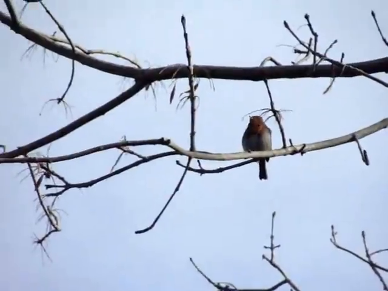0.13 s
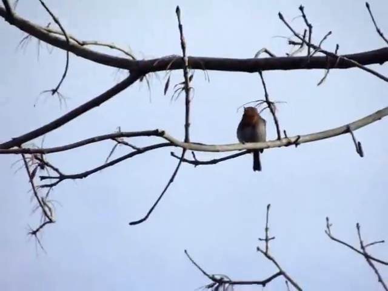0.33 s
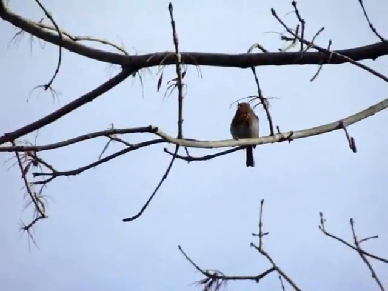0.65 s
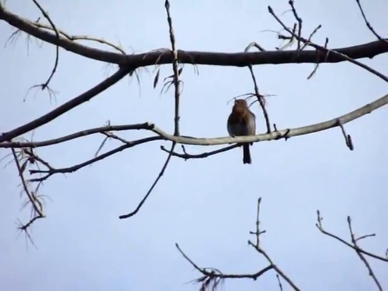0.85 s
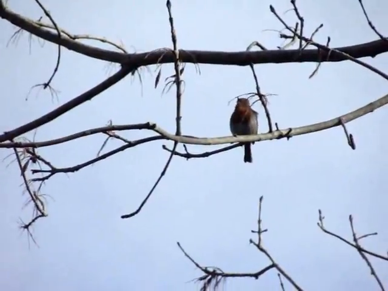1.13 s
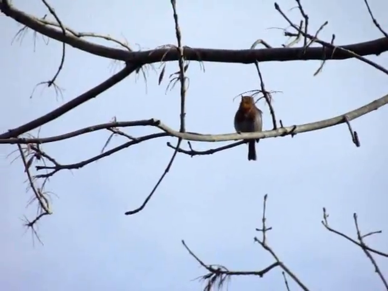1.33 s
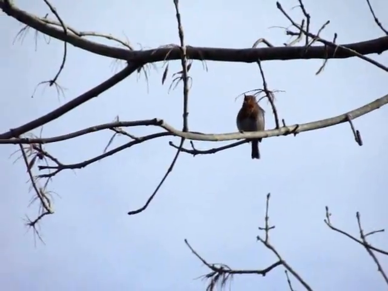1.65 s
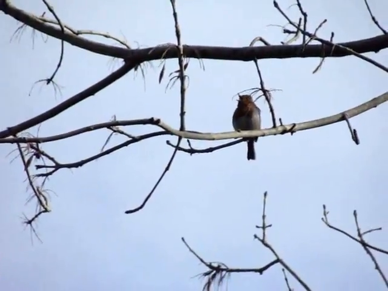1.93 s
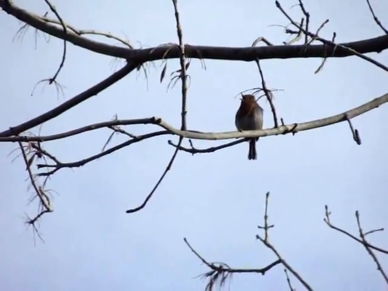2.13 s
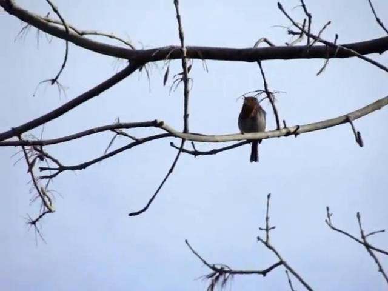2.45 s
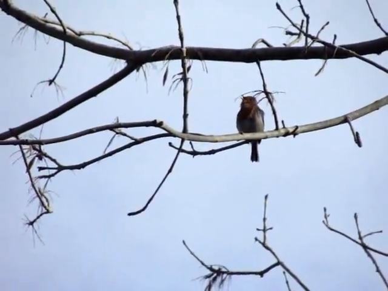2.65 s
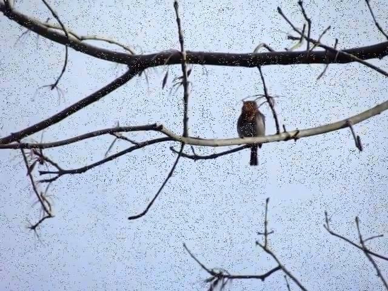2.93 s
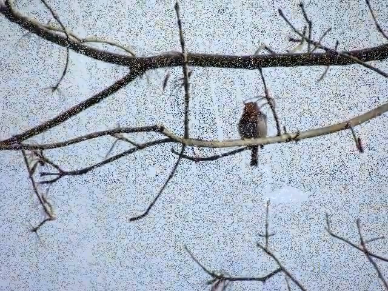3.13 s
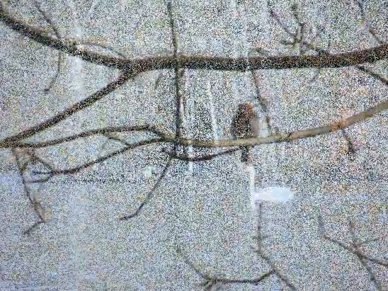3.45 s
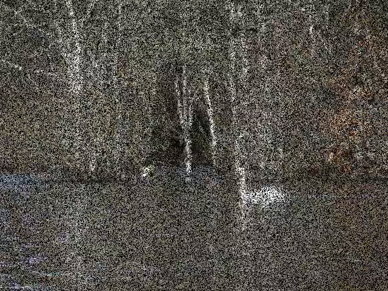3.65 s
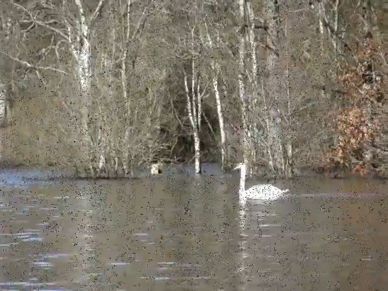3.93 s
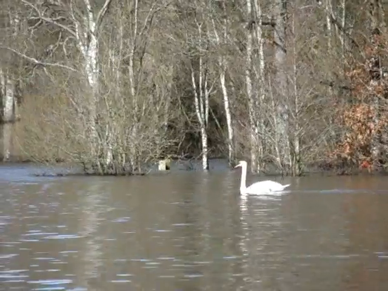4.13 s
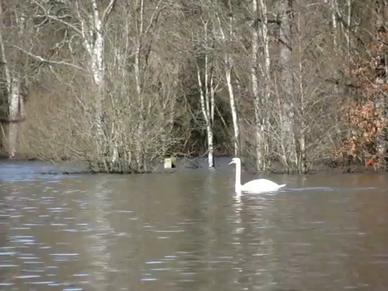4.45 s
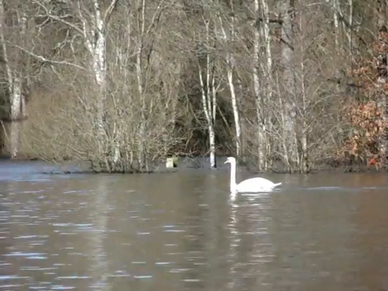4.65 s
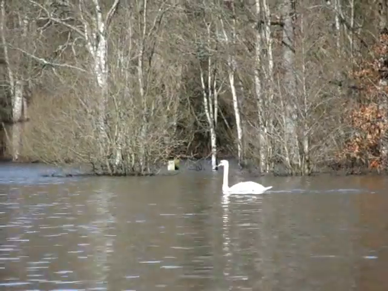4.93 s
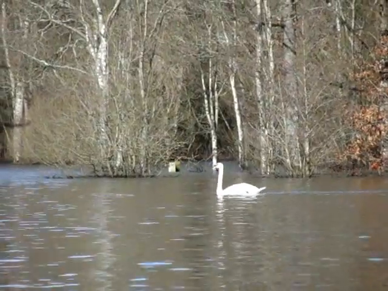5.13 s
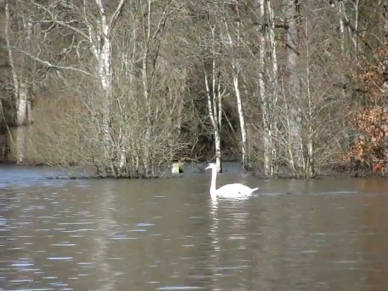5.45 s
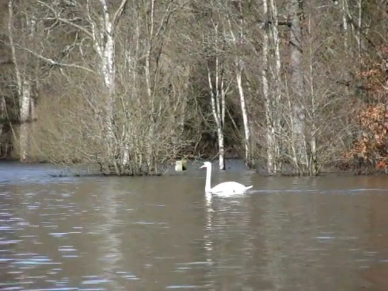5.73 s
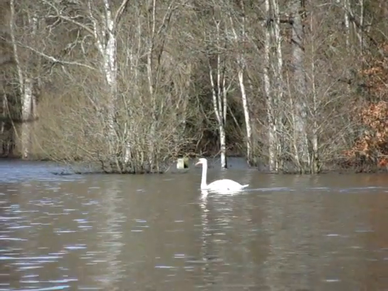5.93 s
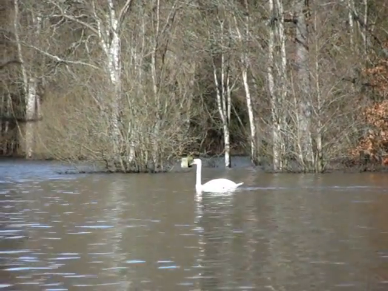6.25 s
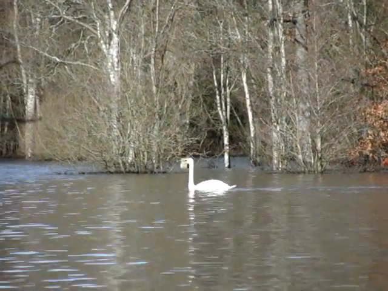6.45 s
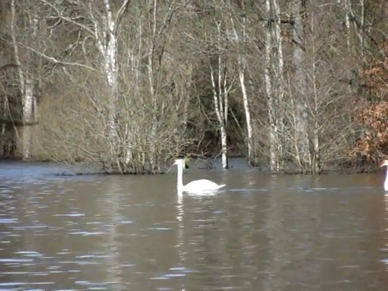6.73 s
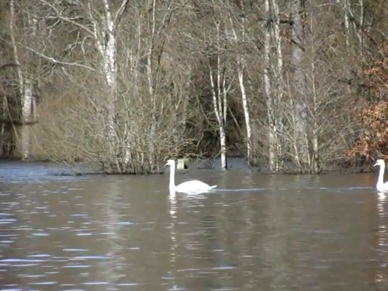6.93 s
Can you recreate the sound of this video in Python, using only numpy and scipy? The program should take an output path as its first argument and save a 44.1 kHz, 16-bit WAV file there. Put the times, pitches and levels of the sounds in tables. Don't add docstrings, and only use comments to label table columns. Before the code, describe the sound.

Outdoors, on a slightly harsh, hissy camera microphone, low wind gusts puff and thump beneath a lively robin phrase of fast chips, steep slides and thin doubled whistles, lightly echoed by trees. The song closes on softer, lower notes at about three seconds. After a short hard click, the sound settles into quiet lakeside air, with distant birds calling across the water in long woodland reverberation and no distinct splashing.

```python
import sys
import numpy as np
from scipy import signal
from scipy.fft import rfft, irfft
from scipy.io import wavfile
from scipy.ndimage import uniform_filter1d

SR = 44100
rng = np.random.default_rng(int(sys.argv[2]) if len(sys.argv) > 2 else 0)


def convert_level_to_amplitude(level_db):
    exponent = np.asarray(level_db, float) / 20
    return 10 ** exponent


def unload_audio(sound):
    columns = np.transpose(np.atleast_2d(sound))
    steps = np.round(np.clip(columns, -1, 1) * 32767)
    wavfile.write(sys.argv[1], SR, steps.astype(np.int16))


N = 313127
T = np.arange(N) / SR

# time_share, pitch_share (first to second pitch), level_db
SEEP = [
    (0, 0, -3),
    (0.201, 0.27, -1),
    (0.802, 0.72, 0.),
    (1.001, 0.011, -11.5),
]


def unit(x):
    return x / np.sqrt(np.mean(x ** 2))


def coloured(points):
    hz, db = np.transpose(points)
    bins = np.fft.rfftfreq(N, 1 / SR) + 1
    gain = convert_level_to_amplitude(np.interp(np.log(bins), np.log(hz), db))
    return unit(irfft(rfft(rng.standard_normal(N)) * gain, N))


def band(lo_hz, hi_hz, order=2):
    sos = signal.butter(order, [lo_hz, hi_hz], "bandpass", fs=SR, output="sos")
    return unit(signal.sosfilt(sos, rng.standard_normal(N)))


def walk(rate_hz):
    k = int(SR / rate_hz)
    steps = np.repeat(rng.standard_normal(N // k + 1), k)[:N]
    return unit(uniform_filter1d(uniform_filter1d(steps, k), k))


def sing(rows, shape):
    return [[(s + at * length, first + way * (second - first), db + rel) for at, way, rel in shape]
            for s, length, first, second, db in rows]


def whistle(notes, waver, flutter_db, edge_s):
    out, pitch_chance, level_chance = np.zeros(N), walk(420), walk(380)
    edge = max(int(edge_s * SR), 1)
    for note in notes:
        s, hz, db = np.transpose(note)
        span = slice(int(s[0] * SR) - edge, int(s[-1] * SR) + edge)
        t = T[span]
        glide = uniform_filter1d(np.interp(t, s, hz), edge)
        pitch = glide * (1 + waver * pitch_chance[span])
        fade = np.clip(np.minimum(t - t[0], t[-1] - t) / (2 * edge_s), 0, 1)
        level = np.interp(t, s, db) + flutter_db * level_chance[span]
        out[span] += np.sqrt(2) * convert_level_to_amplitude(level) * fade * np.sin(2 * np.pi * np.cumsum(pitch) / SR)
    return out


def trees(x, t60_s, tail_db, echo_s, echo_db, spread_s):
    t = T[:2 * SR]
    haze = unit(np.exp(-np.log(1000) * t / t60_s) * (1 - np.exp(-t / 0.048)))
    echo = unit(np.exp(-.5 * ((t - echo_s) / spread_s) ** 2))
    chance = rng.standard_normal((2, len(t))) / np.sqrt(len(t))
    response = convert_level_to_amplitude(tail_db) * haze * chance[0] + convert_level_to_amplitude(echo_db) * echo * chance[1]
    return signal.fftconvolve(x, response)[:N]


def air():
    # freq_hz, density_db (per Hz)
    tree_air = [(240, -33), (400, -14), (730, -14.5), (917, -11), (1180, -15.5), (2100, -13.5), (3140, -21),
                (9800, -25.5), (12700, -91), (21600, -120)]
    lake_air = [(15, -46), (25, -16), (70, -10), (155, -8), (304, -6), (345, -8), (936, -4), (1300, -10),
                (1980, -3), (2610, -13), (4410, -13), (5520, -16.5), (9800, -19.5), (12700, -50),
                (21600, -120)]
    # time_s, lake_share (0-1)
    dissolve = [
        (2.95, 0.),
        (3.62, .7),
        (3.72, 1.),
    ]
    tree_db, lake_db, circuit_db = -52, -51.8, -74.0
    chatter = convert_level_to_amplitude(-14 + 3 * walk(40)) * band(1850, 2100)
    chatter += convert_level_to_amplitude(-19 + 3 * walk(25)) * band(1330, 1460)
    tree = convert_level_to_amplitude(tree_db + 0.78 * walk(3.22)) * coloured(tree_air)
    lake = convert_level_to_amplitude(lake_db + 0.11 * walk(3.29)) * (coloured(lake_air) + chatter)
    share = np.interp(T, *np.transpose(dissolve))
    return (1 - share) * tree + share * lake + convert_level_to_amplitude(circuit_db) * rng.standard_normal(N)


def wind():
    # time_s, rumble_db
    gusts = [(0.0, -45), (0.18, -34), (0.24, -43.5), (0.44, -29), (0.47, -19.5), (0.7, -26), (0.87, -43.5),
             (0.9, -35), (1.12, -49), (1.82, -36), (2.19, -37), (2.46, -52.5), (2.67, -36), (2.86, -47),
             (3.39, -41.5), (3.62, -48)]
    flap_full_db, flap_slope, flap_least_db = -24.5, 1.2, -17.5
    puffs_db = 2.0 * walk(29.73)
    rumble = unit(convert_level_to_amplitude(puffs_db) * (band(70, 193) + convert_level_to_amplitude(-4) * band(36.6, 83)))
    flap = unit(convert_level_to_amplitude(0.4 * puffs_db + 4.3 * walk(90)) * band(224, 620, order=3))
    rumble_db = np.interp(T, *np.transpose(gusts), right=-120)
    flap_db = np.clip(flap_slope * (rumble_db - flap_full_db), flap_least_db, 0)
    return convert_level_to_amplitude(rumble_db) * (rumble + convert_level_to_amplitude(flap_db - 3.0) * flap)


def quick_syllables():
    # time_share, pitch_share (first to second pitch), level_db
    flick = [
        (0, .1, -1.5),
        (.48, 0.014, -1.5),
        (0.658, 0.17, -0.5),
        (0.822, .6, 2),
        (1, 1, -14.5),
    ]
    stroke = [
        (0, 0, -7),
        (.22, .28, -1.5),
        (.5, .68, 0.),
        (0.742, .76, -2),
        (1.001, 1, -17),
    ]
    scoop = [
        (0, 0, -24),
        (.3, .66, -9),
        (.42, .87, 0.),
        (.58, 1, -3),
        (1, 1, -7),
    ]
    chip = [
        (0, 0, -25.5),
        (.25, 0.26, -4.5),
        (0.381, 0.86, -2.5),
        (0.561, 0.62, -5),
        (1, .1, -39),
    ]
    # start_s, length_s, first_hz, second_hz, level_db
    seeps = [(.27, 0.096, 8210, 8320, -46.5), (.465, 0.066, 9300, 9740, -49.5),
             (.668, 0.032, 8140, 8140, -21.5), (.7, .028, 8930, 8460, -37.5),
             (.728, 0.039, 8190, 8080, -27), (.804, 0.0129, 8000, 8400, -37.5),
             (.825, 0.019, 8250, 8300, -48), (.828, 0.015, 7430, 7000, -36.5),
             (1.016, 0.016, 5340, 5130, -18), (1.542, .033, 7900, 7100, -52),
             (1.665, .022, 8930, 9240, -28), (2.229, 0.037, 7920, 8070, -23.5),
             (2.243, 0.03, 9020, 9200, -32)]
    flicks = [
        (.826, .021, 3530, 4550, -19.5),
        (.959, .023, 3280, 5003, -17.5),
        (1.099, .026, 3494, 4990, -13.5),
        (1.258, 0.021, 3424, 5400, -15.5),
    ]
    strokes = [
        (.871, 0.011, 3500, 2870, -20.5),
        (1.026, .039, 5206, 3040, -14),
        (1.178, .044, 5800, 2904, -12),
        (1.95, 0.037, 8920, 7010, -19),
    ]
    scoops = [
        (.851, .022, 3250, 4180, -15),
        (1.627, .026, 2700, 8370, -19),
        (1.915, .017, 3990, 8400, -19),
        (2.201, .028, 3500, 8900, -21),
        (2.342, .014, 3510, 8800, -23),
    ]
    chips = [
        (.899, .021, 3150, 4050, -5),
        (2.128, .02, 8100, 8580, -20),
    ]
    short = sing(seeps, SEEP) + sing(flicks, flick) + sing(strokes, stroke)
    return short + sing(scoops, scoop) + sing(chips, chip)


def peaked():
    # start_s, length_s, shoulder_hz, peak_hz, level_db
    rows = [
        (1.92, .047, 7000, 7710, -20),
        (2.005, .071, 7620, 8150, -17),
        (2.101, .064, 7550, 8850, -15),
    ]
    leap_s, shoulder_s, peak_s = 0.0076, 0.014, .039
    leap_from, drop_to_hz, climb_db_per_khz = .62, 6740, -6.5
    return [[(s, leap_from * hz, db - 25.5),
             (s + leap_s, hz, db),
             (s + shoulder_s, hz * 1.01, db - 4),
             (s + peak_s, peak, db + climb_db_per_khz * (peak - hz) / 1000 + 1.0),
             (s + max(length, peak_s + 0.014), drop_to_hz, db - 9)]
            for s, length, hz, peak, db in rows]


def duet():
    # time_s, pitch_hz, level_db
    high_voice = [(2.348, 6177, -26), (2.355, 6696, -21), (2.378, 6103, -28), (2.411, 6710, -20.5),
                  (2.468, 6936, -18.5), (2.512, 6707, -17.5), (2.534, 5700, -23.5)]
    low_voice = [(2.357, 8680, -37), (2.361, 6935, -18.5), (2.366, 5900, -32), (2.386, 5080, -29),
                 (2.425, 5830, -28), (2.506, 5650, -25.5), (2.525, 5350, -37)]
    high, low = np.transpose(high_voice[2:]), np.transpose(low_voice)
    low_hz = np.interp(high[0], low[0], low[1])
    low_db = np.interp(high[0], low[0], low[2])
    side_tone = np.transpose([high[0], 2 * high[1] - low_hz, low_db - 9])
    return [high_voice, low_voice, side_tone]


def song():
    # time_s, pitch_hz, level_db
    open_high = [(.525, 9510, -30), (.54, 9250, -37.5), (.582, 8790, -28), (.645, 8510, -25.5),
                 (.657, 8500, -49)]
    open_low = [(.476, 8420, -46), (0.5, 8040, -35.5), (.515, 8450, -37.5), (0.547, 8130, -38),
                (.57, 8200, -30)]
    fade_high = [(1.316, 3700, -24.5), (1.342, 3650, -20), (1.355, 3955, -25.5), (1.385, 3540, -24),
                 (1.411, 3690, -24.5), (1.53, 3617, -40)]
    fade_low = [(1.318, 3400, -38), (1.35, 3230, -33), (1.4, 3220, -35), (1.456, 3300, -39),
                (1.525, 3420, -46)]
    swoop_high = [(1.692, 8960, -39), (1.705, 9010, -24), (1.73, 8730, -22), (1.787, 7244, -17.5),
                  (1.799, 6530, -21.5), (1.818, 4580, -33)]
    swoop_low = [(1.635, 4987, -35), (1.642, 6662, -26), (1.66, 7373, -22.5), (1.68, 7800, -19),
                 (1.703, 7880, -18), (1.741, 7475, -22), (1.784, 6890, -27.5)]
    long = [open_high, open_low, fade_high, fade_low, swoop_high, swoop_low]
    return quick_syllables() + peaked() + long + duet()


def robin():
    # time_s, pitch_hz, level_db
    closing = [
        [(2.605, 3420, -21), (2.617, 3600, -14), (2.63, 3662, -14), (2.67, 3590, -15), (2.74, 3536, -16),
         (2.76, 3467, -15.5), (2.775, 3310, -17.5), (2.787, 2400, -46)],
        [(2.836, 2767, -26), (2.86, 3074, -18.5), (2.9, 3118, -19.5), (2.922, 3060, -25), (3.015, 2978, -29),
         (3.035, 2990, -35), (3.06, 3190, -42), (3.088, 2970, -44), (3.1, 2750, -56)],
    ]
    voices = whistle(song(), waver=.0075, flutter_db=2.2, edge_s=.0015)
    voices += whistle(closing, waver=.002, flutter_db=1.1, edge_s=.002)
    voices = voices * (1 + convert_level_to_amplitude(-19) * band(50, 600))
    throat = voices + 0.15 * voices ** 2 - 0.6 * voices ** 3
    twigs = trees(voices, t60_s=0.32, tail_db=-17.5, echo_s=0.013, echo_db=-20.5, spread_s=0.0037)
    wood = trees(voices, t60_s=1.0, tail_db=-24, echo_s=0.066, echo_db=-19.5, spread_s=0.028)
    return throat + twigs + wood


def thumps():
    # start_s, level_db (peak), pitch_hz
    eddies = [
        (0.414, -19, 262),
        (0.454, -12, 368),
        (0.494, -9.5, 310),
        (0.543, -21, 183),
        (0.585, -15, 191),
        (0.608, -10, 167),
        (0.683, -9.5, 252),
    ]
    out = np.zeros(N)
    for s, db, hz in eddies:
        cycles = (T - s) * hz
        out += convert_level_to_amplitude(db - 1.5) * np.sin(2 * np.pi * cycles) * np.exp(-((cycles - .6) / 0.85) ** 2)
    return out


def far_birds():
    # time_share, pitch_share (first to second pitch), level_db
    whit = [
        (0, 0, -24),
        (.12, .45, -17),
        (.19, 1.03, -2.),
        (.3, 1, -3),
        (.65, 1, -1.),
        (1, .99, -10),
    ]
    # start_s, length_s, first_hz,
    # second_hz, level_db
    held = [
        (3.85, .035, 4750, 4800, -60),
        (3.93, .06, 3050, 2590, -65),
        (3.96, .085, 4460, 4450, -58),
        (4.06, .06, 2660, 2480, -63),
        (4.095, .09, 4290, 4240, -57),
        (5.056, .02, 5100, 6300, -51),
        (5.256, .02, 4800, 6000, -53),
        (3.32, .09, 2960, 2930, -58),
        (3.18, .04, 3800, 3100, -59),
    ]
    smeared = [
        (3.53, .13, 5150, 5300, -69),
        (3.71, .07, 5300, 5200, -64),
        (3.8, .2, 5450, 5200, -66),
        (4.07, .1, 5150, 5200, -66),
    ]
    whits = [
        (5.06, .13, 2800, 4275, -41.5),
        (5.26, 0.12, 2800, 4290, -43.5),
    ]
    # start_s, level_db, pitch_hz
    slurs = [
        (4.196, -59, 3550),
        (4.261, -52.5, 3420),
        (4.329, -50, 3530),
        (4.402, -49, 3440),
        (4.478, -50, 3364),
        (4.558, -51, 3325),
        (4.63, -51, 3310),
    ]
    tick_rows = [
        (5.974, -44, 7240),
        (6.215, -46, 6920),
    ]
    twitter_rows = [
        (6.5468, -59, 7700),
        (6.5877, -54, 7960),
        (6.6531, -57, 7740),
        (6.7299, -53, 8030),
        (6.7618, -49.5, 7760),
        (6.8766, -57, 7380),
        (6.912, -56, 7630),
        (6.9739, -54, 7570),
        (7.0367, -60, 7370),
    ]
    trill = [[(s, hz, db - 3), (s + .02, hz * .96, db), (s + .035, hz * .89, db + 1), (s + .046, hz * .82, db - 6)]
             for s, db, hz in slurs]
    ticks = [[(s, hz * .7, db - 8), (s + .003, hz * 1.06, db - 4), (s + .016, hz * .94, db - 10)]
             for s, db, hz in tick_rows]
    twitter = [[(s, hz * 1.05, db - 8), (s + .015, hz, db - 5), (s + .05, hz * .96, db - 9)]
               for s, db, hz in twitter_rows]
    clear = sing(held, SEEP) + sing(whits, whit) + trill
    calls = whistle(clear, waver=0.0054, flutter_db=3.5, edge_s=0.0022)
    calls += convert_level_to_amplitude(3) * whistle(sing(smeared, SEEP), waver=.04, flutter_db=3, edge_s=.004)
    calls += whistle(twitter + ticks, waver=.035, flutter_db=3, edge_s=.002)
    calls = calls + trees(calls, t60_s=.15, tail_db=-8, echo_s=.012, echo_db=-10, spread_s=.006)
    return calls + trees(calls, t60_s=2.2, tail_db=-10.5, echo_s=.47, echo_db=-18, spread_s=.01)


def knock():
    # start_s, level_db (peak)
    start_s, peak_db = (3.4333, -22.5)
    # freq_hz, level_db, t60_s
    modes = [
        (2250, -7, 0.028),
        (3120, -4.5, 0.011),
        (4500, -8, 0.0062),
        (6480, -1.5, 0.014),
        (14200, -35, 0.0073),
    ]
    t = np.clip(T - start_s, 0, None)
    ring = sum(convert_level_to_amplitude(db) * np.sin(2 * np.pi * hz * t) * np.exp(-np.log(1000) * t / t60) for hz, db, t60 in modes)
    rattle = convert_level_to_amplitude(-4) * band(2000, 6500) * np.exp(-t / 0.0028) * (t > 0)
    return convert_level_to_amplitude(peak_db) * (ring + rattle)


def scene():
    return (air() + wind() + robin() + thumps() + far_birds() + knock())[None]


def roll_off(x):
    return signal.sosfilt(signal.butter(12, 16820, fs=SR, output="sos"), x)


def record(dry):
    camera_hz = 32000
    step = np.gcd(SR, camera_hz)
    camera = signal.resample_poly(dry, camera_hz // step, SR // step, axis=1)
    loudness = uniform_filter1d(np.abs(np.diff(camera, prepend=0)), size=400, axis=1)
    camera = camera + convert_level_to_amplitude(-26.5) * loudness * rng.standard_normal(camera.shape)
    held = camera[:, np.arange(N) * camera_hz // SR]
    return roll_off(held)


dry = scene()
out = record(dry)
unload_audio(out)
```